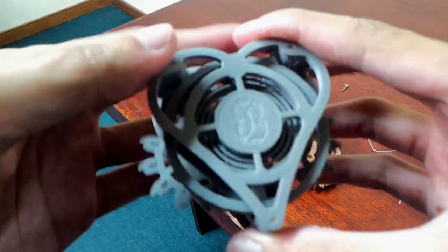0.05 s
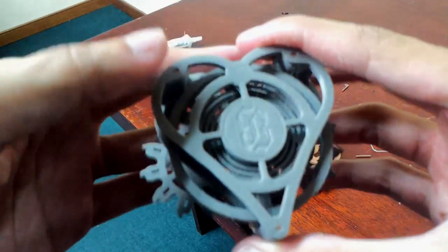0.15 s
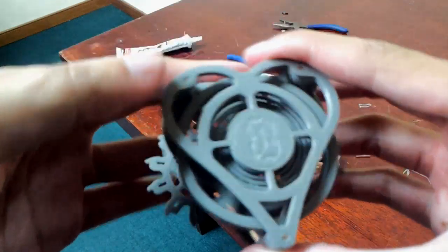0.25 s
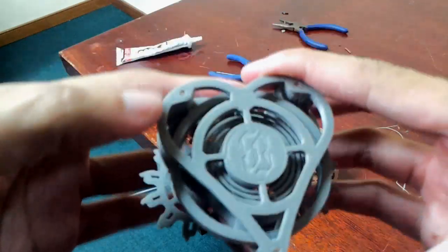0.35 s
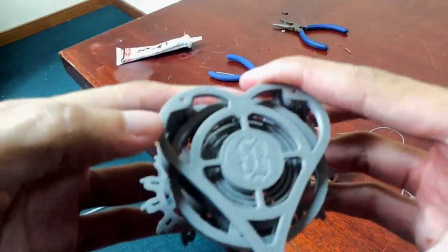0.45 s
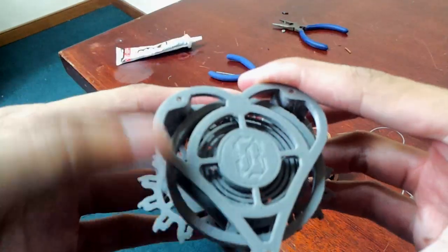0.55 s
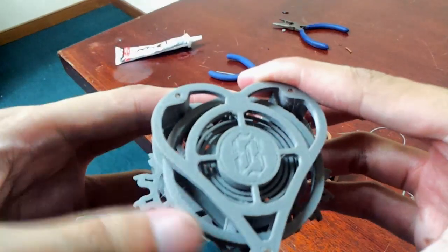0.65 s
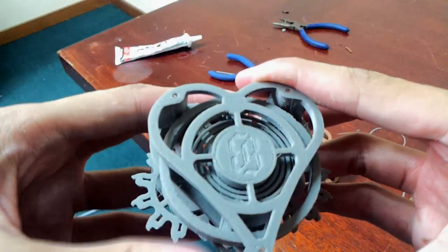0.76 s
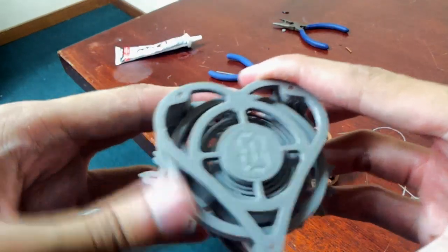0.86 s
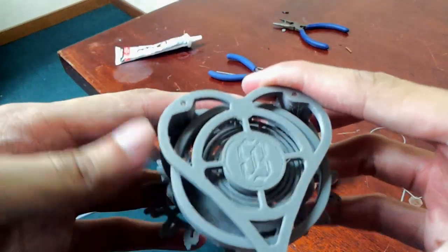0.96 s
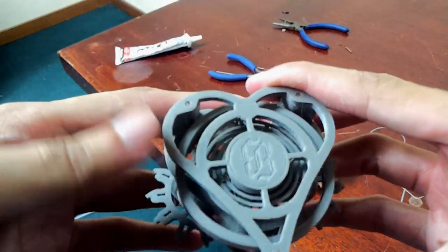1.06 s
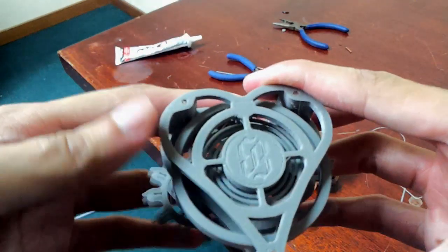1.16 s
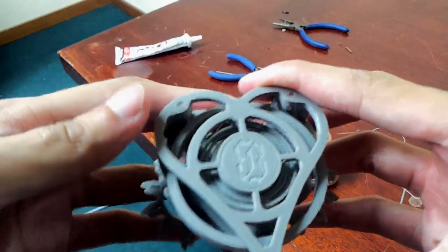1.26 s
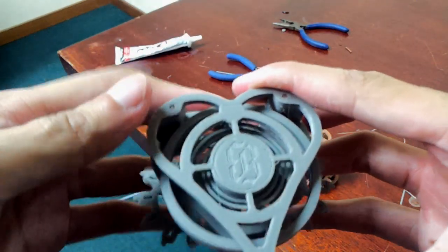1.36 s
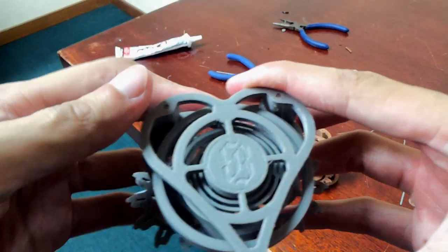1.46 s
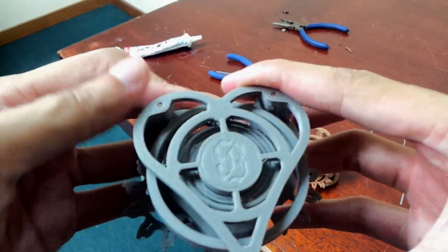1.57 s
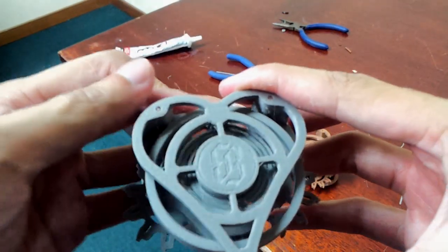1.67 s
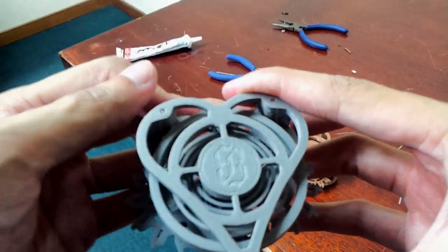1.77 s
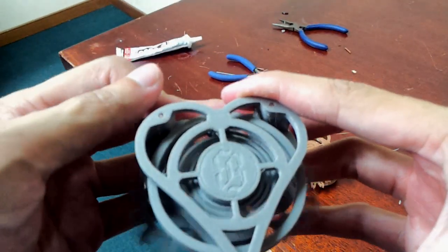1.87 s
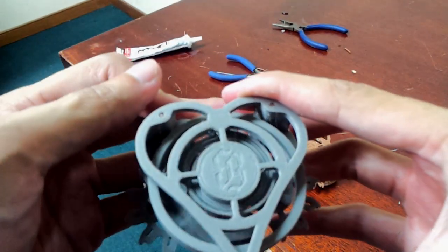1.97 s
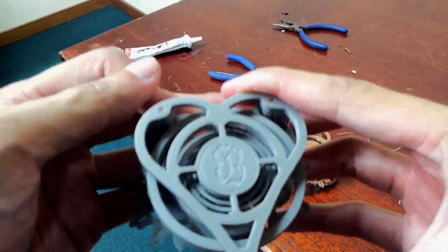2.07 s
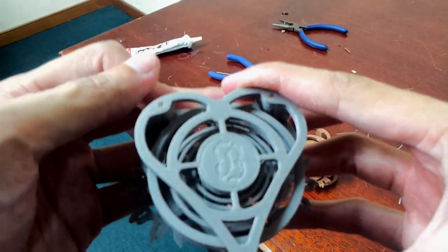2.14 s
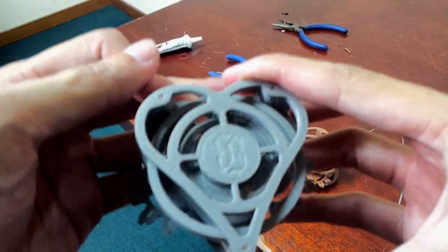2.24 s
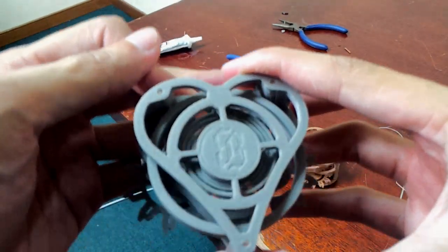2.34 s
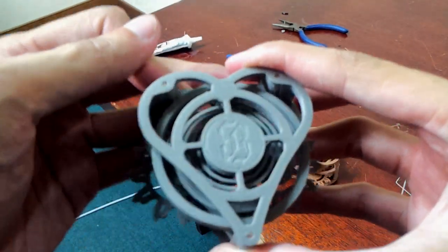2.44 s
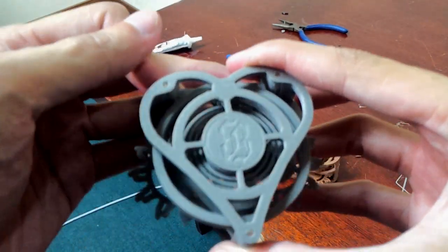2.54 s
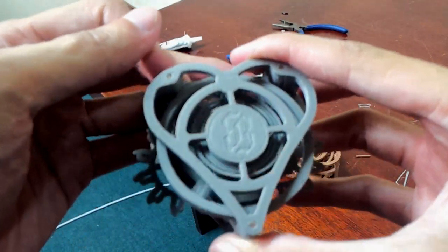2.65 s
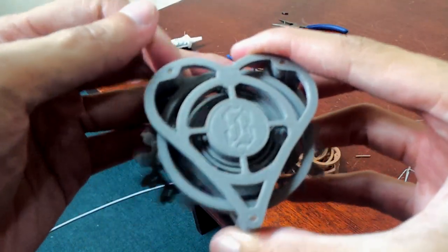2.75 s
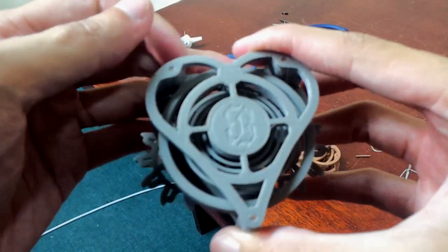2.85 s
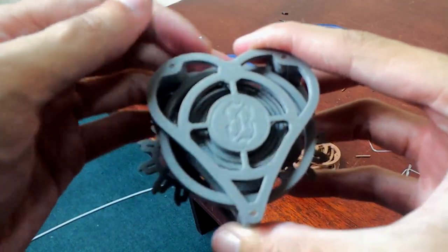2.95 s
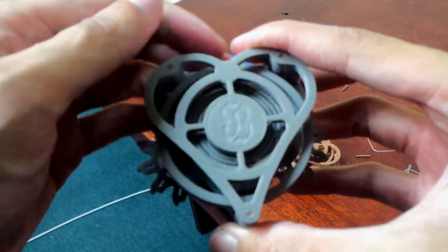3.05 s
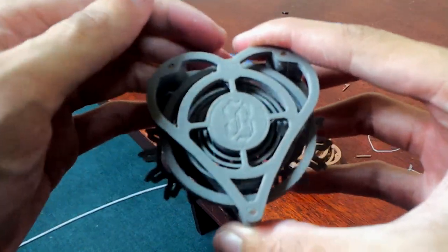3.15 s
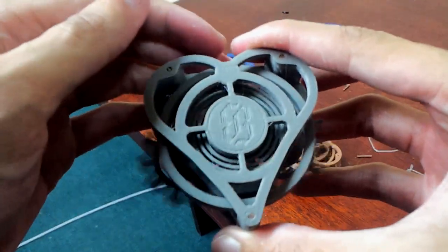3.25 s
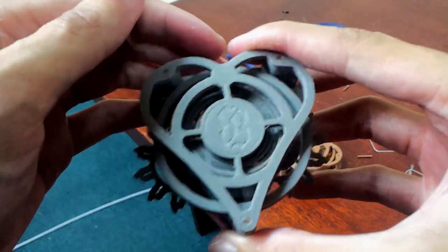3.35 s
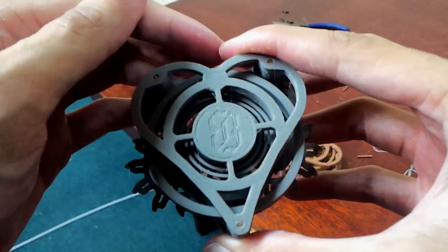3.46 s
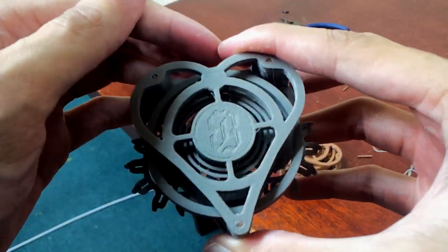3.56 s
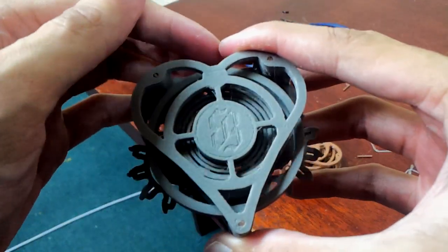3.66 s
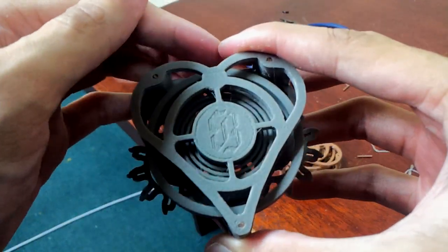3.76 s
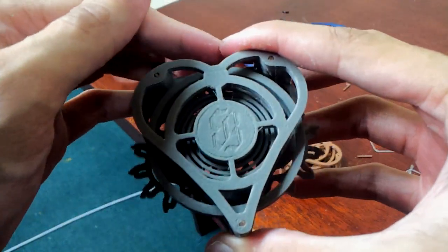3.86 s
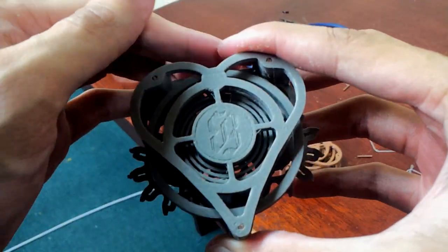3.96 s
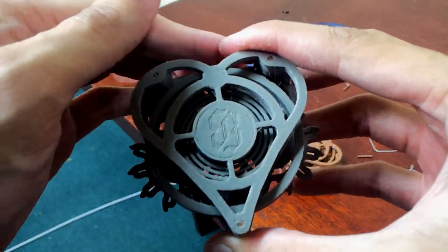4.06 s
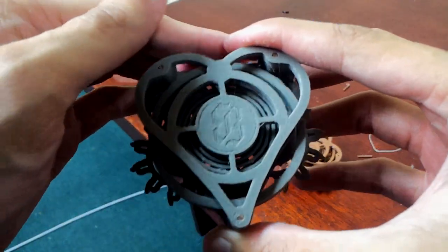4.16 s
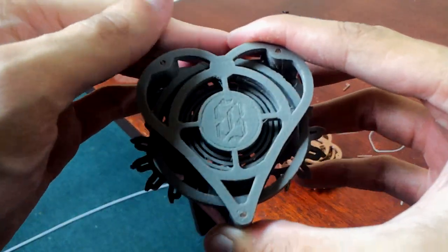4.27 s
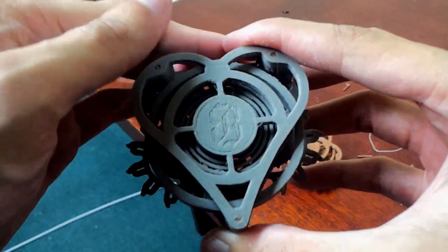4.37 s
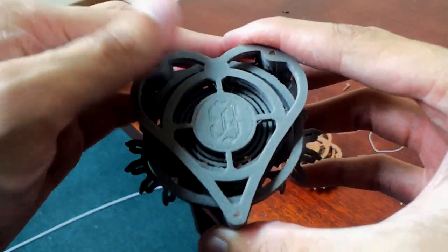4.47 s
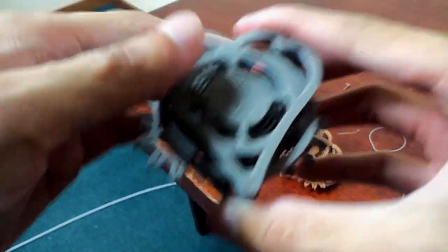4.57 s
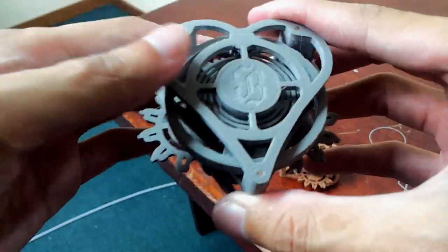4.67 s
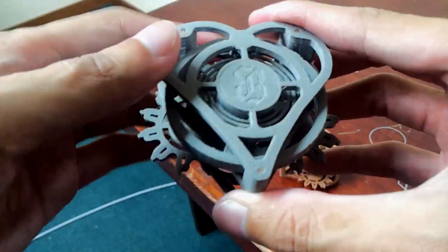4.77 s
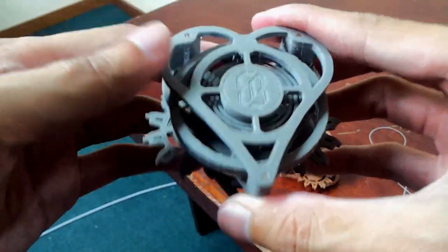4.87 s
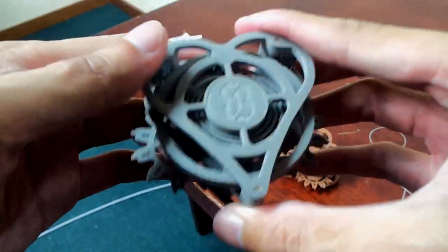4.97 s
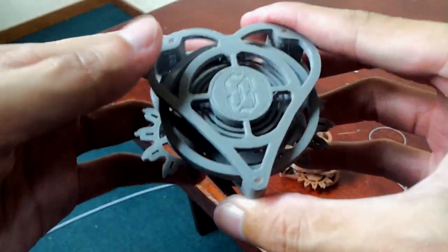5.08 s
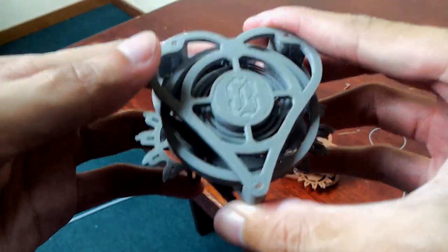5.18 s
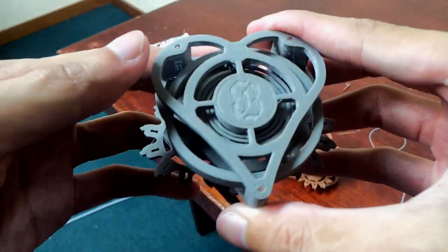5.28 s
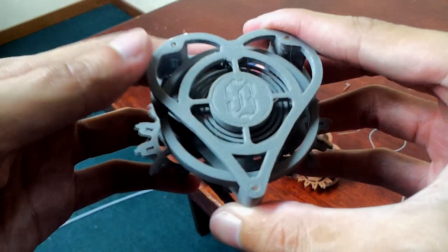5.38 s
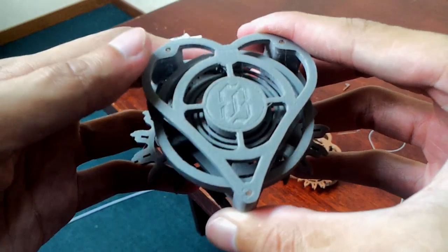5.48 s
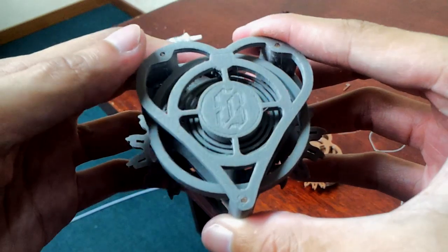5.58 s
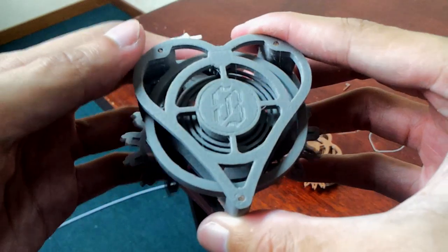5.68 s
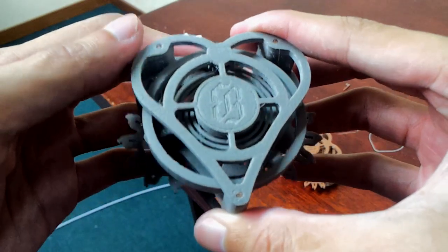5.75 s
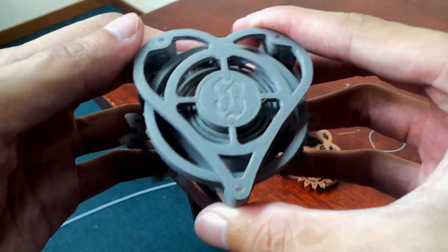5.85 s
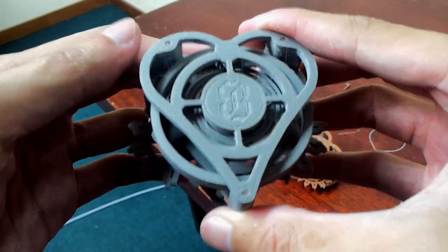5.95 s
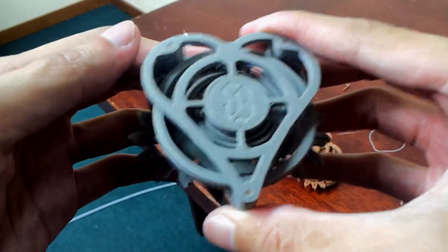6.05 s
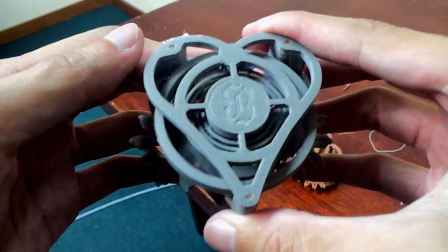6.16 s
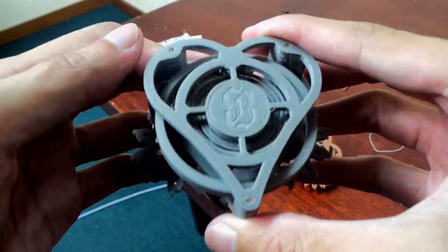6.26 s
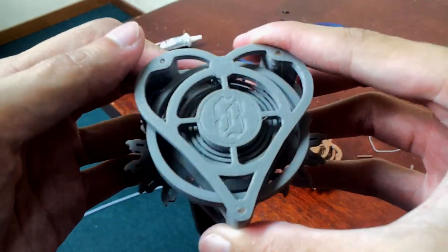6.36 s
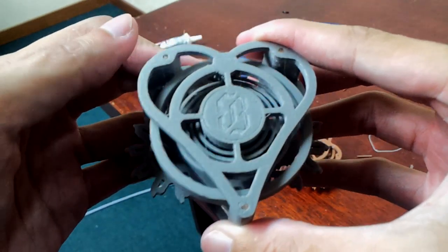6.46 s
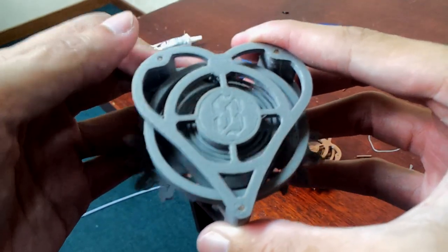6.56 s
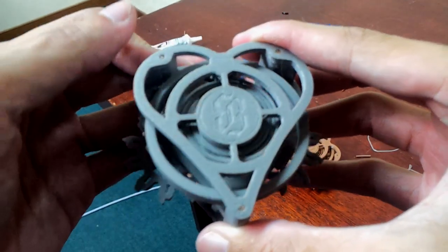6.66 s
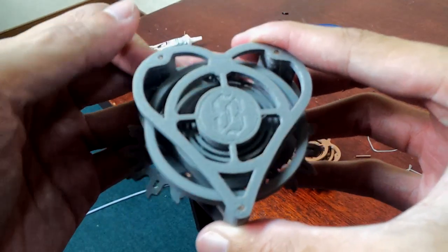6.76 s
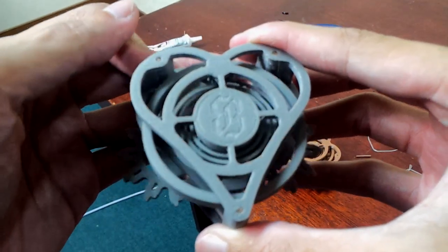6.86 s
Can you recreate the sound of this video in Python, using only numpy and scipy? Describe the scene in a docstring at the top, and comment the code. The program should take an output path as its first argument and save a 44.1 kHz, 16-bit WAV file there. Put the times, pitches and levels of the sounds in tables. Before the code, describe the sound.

A small plastic clockwork toy held in the hands clicks loosely, then ticks briskly about six times a second, stalls, rests, and restarts unevenly.

```python
"""A plastic clockwork toy is held in the hands in a small room; at first only loose gears click and fingers rub.
After a second a finger drives it, and about six times a second the escape wheel unlocks, slides, kicks and drops.
It stalls before the fourth second, rests, and starts again after the fifth, less evenly, until the end.
Contacts are chattering noise bursts through frame modes and a damped tooth ring; slides and rubbing are random
grains. Decaying-noise echoes, lumpy rumble, hiss, a faint whine and hum lie behind it all the way through."""
import sys
import numpy as np
from scipy import signal
from scipy.fft import rfft, irfft, next_fast_len
from scipy.io import wavfile

SR = 44100
rng = np.random.default_rng(int(sys.argv[2]) if len(sys.argv) > 2 else 0)


def transcribe(u):
    """Save the signal u as a 16-bit wav file named by the first command-line argument.

    u: samples, shape (n,) or (channels, n), limited to [-1, 1]; the rate is SR.
    q: integer samples, one column per channel.
    """
    v = np.clip(np.atleast_2d(u).T, -1, 1)
    q = np.round(v * 32767).astype(np.int16)
    wavfile.write(sys.argv[1], SR, q)


N = 305172

# Levels in the tables are starting points; the layers trim them as a whole.
# Beats of the escapement: a tooth unlocks, slides, kicks the fork and drops on the other pallet.
# Each row: drop in seconds, drop level in dB, ring of the drop in Hz, kick in ms before the drop, kick level in dB,
# unlocking in ms before the drop, unlocking level in dB, slide level in dB, frame against tooth in dB.
BEATS = [(1.0361, -20, 12700, 24.4, -26, 37.5, -37.5, -56.5, -10.5),
         (1.2063, -24, 13700, 20.6, -26, 29, -41, -51, -3.5),
         (1.3827, -21, 14200, 14, -27, 31, -36.5, -48, -6.5),
         (1.5525, -23, 14300, 12.7, -32.5, 31, -38, -47, -4),
         (1.7261, -34.5, 13900, 10.4, -29, 22.3, -42, -47.5, -2.5),
         (1.8983, -23, 9450, 8.2, -23, 24.3, -45, -39.5, -4),
         (2.0738, -18.5, 13800, 11.2, -22.5, 20, -31, -42, -7),
         (2.2434, -19.5, 10300, 9, -20, 25.5, -36.5, -42, -8.5),
         (2.4192, -25.5, 10300, 6.2, -23.5, 25.8, -30, -42, -7.5),
         (2.5926, -33, 10100, 8, -31.5, 20.8, -31.5, -43.5, -6.5),
         (2.7687, -31.5, 13600, 13.9, -30, 23.4, -33, -46, -6),
         (2.9402, -22, 9050, 12, -31, 25, -46, -44, -3.5),
         (3.1202, -33.5, 13100, 5, -35, 28, -35.5, -58, -2.5),
         (3.2887, -21.5, 10460, 15.3, -27, 31.3, -37, -45.5, -7.5),
         (3.4652, -23.5, 12900, 19, -31, 39, -43.5, -51, -6.5),
         (3.634, -38.5, 13100, 13, -32, 34.5, -40, -50, -5),
         (3.7791, -34.5, 10300, 8, -38.5, 17, -33.5, -49, -6),
         (5.0816, -35.5, 10800, 8.5, -46, 17, -51, -57.5, 2.5),
         (5.243, -28.5, 14000, 24, -28.5, 38, -47, -57.5, -4),
         (5.4049, -29, 14000, 10, -44.5, 43.8, -47.5, -54.5, -6.5),
         (5.736, -39, 14200, 23.8, -37.5, 25, -60, -71, -2),
         (5.8827, -31.5, 12600, 34.9, -34.5, 52, -53, -63.5, -2.5),
         (6.0609, -18.5, 11400, 20.3, -28, 41, -51, -51.5, -5),
         (6.2295, -28.5, 11000, 17, -27.5, 37, -40.5, -53, -3.5),
         (6.4076, -27, 10700, 13, -22, 27, -50, -43.5, -5),
         (6.578, -28, 12100, 15, -32.5, 27, -46, -44, -6),
         (6.7525, -22, 12100, 10.7, -19.5, 22, -42, -44.5, -2.5),
         (6.9171, -33.5, 9900, 8.7, -30, 24.7, -34, -49.5, -2.5)]
# Gears taking up their play as the toy is handled.
# Each row: time in seconds, level in dB, frame against tooth in dB.
GEAR_CLICKS = [(0.1476, -42.5, -5), (0.1608, -41.5, -9), (0.2447, -48.5, -2), (0.2503, -37.5, -3),
               (0.2935, -60, 6.5), (0.3661, -41.5, -8), (0.8126, -47, -7), (0.9064, -51, -4),
               (0.9189, -50.5, 2), (0.9258, -41, -3), (0.987, -43.5, -5), (1.1575, -46.5, 1.5),
               (1.308, -45, -8), (1.5796, -34, -15), (1.9214, -35.5, -10), (2.0238, -33.5, -18),
               (2.2668, -31.5, -17), (2.3719, -41.5, -12), (2.4427, -41, -6), (2.6185, -37, -14),
               (3.052, -39.5, -11.5), (3.7898, -38.5, -4.5), (3.9097, -45, -6), (4.1666, -36.5, 0),
               (4.546, -63, 1), (4.7127, -47, 5), (4.7424, -53.5, -5), (4.803, -56, -4),
               (4.9186, -54.5, -16), (5.02, -40, -8), (5.0272, -42.5, -0.5), (5.4231, -42.5, -3.5),
               (5.585, -42.5, -7), (6.3255, -43.5, -12), (6.6839, -43, -10.5)]
# How hard the fingers work the toy; they rest twice. Each row: time in seconds, level in dB.
GRIP = [(0, -75.5), (.42, -73.5), (.6, -98), (.78, -100), (.84, -64.5), (.95, -62.5), (1.3, -65.5),
        (2.3, -70.5), (2.5, -57), (2.75, -67.5), (3.2, -75.5), (3.92, -65.5), (4.1, -80), (4.5, -91),
        (4.55, -75), (5.45, -69), (5.6, -73.5), (6.92, -67.5)]
# The hollow frame bumping in the fingers. Each row: start in seconds, level in dB.
FRAME_THUNKS = [(0.158, -56.5), (0.248, -54), (.922, -54.5), (1.205, -47.5), (3.909, -63), (5.083, -57.5)]
# Modes of the plastic frame. Each row: frequency in Hz, 60 dB decay time in seconds, relative level in dB.
FRAME_MODES = [(995, 0.0072, -14.5), (1492, 0.047, -16.5), (2140, 0.021, -27), (2530, 0.02, -14),
               (2794, 0.033, 1.5), (3347, 0.018, 0.5), (3726, 0.013, 0), (3856, 0.038, 4.5),
               (4300, .016, -28.5), (4890, 0.02, -2.5), (5190, 0.0073, -9.5), (6554, 0.0041, -8)]
# Colour of the contact heard through the frame. Each row: frequency in Hz, relative level in dB.
FRAME_COLOUR = [(40, -42.5), (150, -25.5), (500, -16.5), (950, -7.5), (1600, -3.5), (2700, 4.5), (3800, 2),
                (4500, 0.5), (6600, -0.5), (7600, -14)]
# Colour of the contact heard off the tooth. Each row: frequency in Hz, relative level in dB.
TOOTH_COLOUR = [(5500, -40.5), (7100, -12), (8400, -0.5), (9700, 2.5), (11000, 2), (13000, 2.5),
                (14400, -1.5)]
# Dull bumps of the hands on the frame. Each row: frequency in Hz, relative level in dB.
BUMP_COLOUR = [(25, -11), (80, -6), (160, -1.5), (350, -5.5), (700, -8), (1500, -19), (4000, -57)]
# The room's answer. Each row: frequency in Hz, level in dB.
ROOM_COLOUR = [(60, 9.5), (150, 11), (320, 14.5), (600, 3.5), (1400, 4.5), (2200, -5), (3800, -5),
               (4600, -8.5), (7000, -4), (9700, -5), (11500, -7.5), (14500, -9)]
# Colour of the room sound in the side channel. Each row: frequency in Hz, level in dB.
SIDE_COLOUR = [(200, -15), (600, -2), (1200, -9.5), (2200, -24), (4500, -12), (8000, -9), (14000, -12)]
# Spectrum of the steady background. Each row: frequency in Hz, relative level per Hz in dB.
AIR_COLOUR = [(20, -18.5), (45, -13), (70, 2.5), (95, -5.5), (130, -5.5), (200, -9.5), (300, -16.5),
              (470, -23), (820, -25), (2700, -28), (6200, -33.5), (10000, -32), (12500, -35.5),
              (14500, -53)]
# Electrical hum. Each row: frequency in Hz, rms level in dB.
HUM_LINES = [(66, -84.5), (100, -88), (200, -84.5), (300, -89), (400, -87.5)]

# chatter length of each kind of contact at ordinary strength
UNLOCK_MS, KICK_MS, DROP_MS, CLICK_MS = 2.4, 3.6, 2.8, 2.2
# centre pitch of the tooth's ring: escape wheel, and the larger loose gears
WHEEL_HZ, GEAR_HZ = 13800, 10800
AIR_DB = -70.5  # rms of the background noise before its rumble turns lumpy
TOP_HZ = 14650  # upper edge of the treble


def escapement():
    """Every beat strikes three times: a light unlocking, the kick to the fork, the drop."""
    s, drop_db, drop_hz, kick_ms, kick_db, unlock_ms, unlock_db, _, knock_db = np.transpose(BEATS)
    unlocks = np.column_stack([s - unlock_ms / 1000, unlock_db, knock_db])
    kicks = np.column_stack([s - kick_ms / 1000, kick_db, knock_db])
    drops = np.column_stack([s, drop_db, knock_db])
    return np.vstack([
        contacts(unlocks, WHEEL_HZ, UNLOCK_MS),
        contacts(kicks, WHEEL_HZ, KICK_MS),
        contacts(drops, drop_hz, DROP_MS, detune=0.01)])


def contacts(hits, ring_hz, contact_ms, detune=0.088, uneven=0.19, ordinary_db=-30, halving_db=70):
    """Give each hit (s, dB, frame against tooth dB) its own ring and chatter length; harder hits are crisper."""
    s, db, knock_db = np.transpose(hits)
    pitch, length = np.clip(rng.standard_normal((len(s), 2)), -2, 2).T
    # chatter halves for every halving_db above ordinary strength
    crispness = 2 ** ((ordinary_db - db) / halving_db)
    chatter_ms = contact_ms * np.exp(uneven * length) * crispness
    return np.column_stack([s, db + knock_db, db, ring_hz * np.exp(detune * pitch), chatter_ms])


def impacts(table, rise_s, settle_t60, rattle_db, rattle_t60, frame_db, tooth_db, uneven_db=3):
    """Each contact (s, frame dB, tooth dB, ring Hz, ms) chatters unevenly, dies fast and leaves the gears rattling."""
    out, t = np.zeros(N), np.arange(2048) / SR
    for s, low_db, high_db, hz, contact_ms in table:
        # decay starts halfway through the chatter length
        after = np.maximum(t - contact_ms / 1000 / 2, 0)
        decay = fade(after, settle_t60) + undb(rattle_db) * fade(after, rattle_t60)
        press = np.minimum(t / rise_s, 1) * decay
        # the contact force jumps about every third of a millisecond
        chatter = np.repeat(rng.standard_normal(128), 16)
        force = press * undb(uneven_db * chatter) * rng.standard_normal(len(t))
        knock = blow(frame(force), low_db + frame_db)
        snap = blow(tooth(force, hz), high_db + tooth_db)
        add(out, s - rise_s / 2, knock + snap)
    return out


def frame(force, ring_db=7, detune=0.029, place_db=4.5):
    """The frame's dull knock and short modes; their pitch and weight shift with grip and point of contact."""
    chance = rng.standard_normal((len(FRAME_MODES), 2))
    ring = 0
    for (hz, t60, db), (shift, weight) in zip(FRAME_MODES, chance):
        width_hz = np.log(1000) / np.pi / t60
        mode = resonate(force, hz * (1 + detune * shift), width_hz)
        ring = ring + undb(db + place_db * weight) * mode
    return colour(force, FRAME_COLOUR) + undb(ring_db) * ring


def tooth(force, hz, ring_db=4, width_hz=900):
    """The bright snap of a small tooth, with one heavily damped ring."""
    ring = resonate(force, hz, width_hz)
    return colour(force + undb(ring_db) * ring, TOOTH_COLOUR)


def slides(edge_s=0.0034, ridge_s=0.0014, ridge_db=3, overrun_s=0.0066, swell_db=6,
           longest_s=0.0308, pause_s=0.0018):
    """From unlocking until just after the drop, teeth catch and slip over print ridges, pressing ever harder."""
    pressure, t = np.zeros(N), np.arange(N) / SR
    for s, *_, unlock_ms, _, db, _ in BEATS:
        start = s - min(unlock_ms / 1000 - pause_s, longest_s)
        end = s + overrun_s
        span = np.arange(start, end, 1 / SR)
        swell = swell_db * np.linspace(-.5, .5, len(span))
        edges = np.clip(np.minimum(span - start, end - span) / edge_s, 0, 1)
        add(pressure, start, undb(db + swell) * edges)
    # every ridge has its own height
    ridges = np.clip(rng.standard_normal(N), -2, 2)[(t / ridge_s).astype(int)]
    force = pressure * unit(undb(ridge_db * ridges)) * grains(N, per_s=5000, spread_db=1.0)
    dull = unit(frame(force, place_db=-2))
    bright = unit(tooth(force, 10000, ring_db=-3.5, width_hz=2300))
    return np.std(force) * (undb(-1.5) * dull + bright)


def grains(count, per_s, spread_db):
    """Tiny random slips of uneven size and either sign, rms 1."""
    chance, size, sign = rng.random(count), rng.exponential(size=count), rng.standard_normal(count)
    slips = (chance < per_s / SR) * np.sign(sign) * undb(spread_db * np.minimum(size, 4))
    return unit(slips + 1e-9)


def loose_gears(count=60, above_grip_db=13, spread_db=4, knock_db=-7, faint_ms=0.9):
    """The clear clicks of gear play, and faint crisp ones at random that grow with the handling."""
    place, size = rng.random((count, 2)).T
    s = (np.arange(count) + place) / count * N / SR
    faint_db = grip(s) + above_grip_db + spread_db * (2 * size - 1)
    faint = np.column_stack([s, faint_db, np.full(count, knock_db)])
    return np.vstack([
        contacts(GEAR_CLICKS, GEAR_HZ, CLICK_MS, detune=0.15),
        contacts(faint, GEAR_HZ, faint_ms, detune=0.11)])


def grip(s):
    """Level of the handling at time s, in dB, gliding between the grip points."""
    return np.interp(s, *np.transpose(GRIP))


def fingers(rub_db=-5.5, bump_db=-80, bump_share=0.45):
    """Skin and loose parts creak softly against the frame, and the shifting hands bump it."""
    grip_db = grip(np.arange(N) / SR)
    force = undb(grip_db) * grains(N, per_s=2400, spread_db=3.5)
    dull = unit(frame(force, place_db=0.0))
    bright = unit(tooth(force, 9600, ring_db=-17.5, width_hz=290))
    rub = undb(rub_db) * np.std(force) * (undb(-6) * dull + bright)
    # bumps follow the grip less steeply than the rubbing does
    bump_force = undb(bump_share * grip_db) * grains(N, per_s=120, spread_db=2.5)
    bumps = colour(bump_force, BUMP_COLOUR)
    return rub + undb(bump_db) * unit(bumps)


def thunks(hz=750, width_hz=800, push_t60=0.025):
    """A soft, longer push wakes only the low, heavily damped bending of the frame."""
    out, t = np.zeros(N), np.arange(2048) / SR
    for s, db in FRAME_THUNKS:
        force = fade(t, push_t60) * rng.standard_normal(len(t))
        bend = resonate(resonate(force, hz, width_hz), hz, width_hz)
        add(out, s, blow(bend, db))
    return out


def shiver(toy, t60=0.18, frame_db=-1):
    """Shaken by the toy's own sound, the loose gear train buzzes on in tiny collisions as its energy drains."""
    keep = fade(1 / SR, t60) ** 2
    energy = signal.lfilter([1 - keep], [1, -keep], toy ** 2)
    force = np.sqrt(energy) * grains(N, per_s=2000, spread_db=2.0)
    dull = unit(frame(force, ring_db=-12.5, place_db=-2.5))
    bright = unit(tooth(force, 9750, ring_db=1.5, width_hz=700))
    return np.std(force) * (undb(frame_db) * dull + bright)


def room(x, count=24):
    """The toy keeps moving in the hands, so each stretch of its sound meets another pattern of echoes."""
    out, hop = np.zeros(N), N // count + 1
    for start in range(0, N, hop):
        add(out, start / SR, signal.fftconvolve(x[start:start + hop], echoes()))
    return colour(out, ROOM_COLOUR)


def echoes(low_t60=0.43, high_t60=0.26, build_s=0.0021, near_db=-3, near_t60=0.065):
    """Early reflections off hands and bench, then the diffuse tail of a small room, all as decaying noise."""
    t = np.arange(SR // 2) / SR
    low, high, near = rng.standard_normal((3, len(t)))
    low = signal.sosfilt(signal.butter(2, 4500, fs=SR, output="sos"), low)
    high = signal.sosfilt(signal.butter(2, 4500, "high", fs=SR, output="sos"), high)
    tail = low * fade(t, low_t60) + high * fade(t, high_t60) + undb(near_db) * near * fade(t, near_t60)
    tail = tail * (1 - np.exp(-(t / build_s) ** 2))
    return tail / np.sqrt(np.sum(tail ** 2))


def air(whine_hz=11250, whine_width_hz=260, whine_db=-85, lumps_db=3.5, lumps_per_s=14):
    """Lumpy low rumble and smooth faint hiss of the workshop, with a thin high whine of narrow noise."""
    noise = undb(AIR_DB) * unit(colour(rng.standard_normal(N), AIR_COLOUR))
    rumble = signal.sosfiltfilt(signal.butter(2, 350, fs=SR, output="sos"), noise)
    hiss = noise - rumble
    lumps = np.interp(np.arange(N) / SR * lumps_per_s, np.arange(400), rng.standard_normal(400))
    whine = resonate(rng.standard_normal(N), whine_hz, whine_width_hz)
    whine = resonate(whine, whine_hz, whine_width_hz)
    return hiss + rumble * unit(undb(lumps_db * lumps)) + undb(whine_db) * unit(whine)


def hum(wander_hz=1.2):
    """A few sine lines of hum, each wavering slightly in pitch."""
    t, knots = np.arange(N) / SR, np.linspace(0, N / SR, 40)
    out = 0
    for hz, db in HUM_LINES:
        drift = wander_hz * np.interp(t, knots, rng.standard_normal(len(knots)))
        phase = 2 * np.pi * np.cumsum(hz + drift) / SR
        out = out + np.sqrt(2) * undb(db) * np.sin(phase)
    return out


def undb(db):
    """Decibels to gain."""
    return 10 ** (np.asarray(db) / 20)


def unit(x):
    """Scale to rms 1."""
    return x / np.sqrt(np.mean(x ** 2))


def blow(x, db):
    """Scale a click so that its energy, packed into one millisecond, has this level."""
    return x * undb(db) / np.sqrt(np.sum(x ** 2) * 1000 / SR)


def fade(t, t60):
    """Exponential decay, 60 dB down after t60."""
    return np.exp(-np.log(1000) * t / t60)


def resonate(x, hz, width_hz):
    """One resonance, gain 1 at its centre."""
    return signal.lfilter(*signal.iirpeak(min(hz, .45 * SR), hz / width_hz, fs=SR), x)


def colour(x, points):
    """Causal filter through (Hz, dB) points, built from the cepstrum."""
    size = next_fast_len(len(x) + 2048, real=True) * 2
    hz, db = np.transpose(points)
    freq = np.maximum(np.arange(size // 2 + 1) * SR / size, 1)
    gain = undb(np.interp(np.log(freq), np.log(hz), db))
    cepstrum = irfft(np.log(gain))
    # folding the cepstrum forward gives minimum phase
    cepstrum[1:size // 2] *= 2
    cepstrum[size // 2 + 1:] = 0
    return irfft(rfft(x, size) * np.exp(rfft(cepstrum)))[:len(x)]


def add(track, s, sound):
    """Mix a sound into the track at time s."""
    start = max(int(s * SR), 0)
    track[start:start + len(sound)] += sound[:max(len(track) - start, 0)]


def scene():
    """The toy sits dead centre; only the room and the background have a little width."""
    beats = impacts(escapement(), rise_s=.0005, settle_t60=0.017, rattle_db=-20.5, rattle_t60=0.028,
                    frame_db=-1.0, tooth_db=1.35)
    clicks = impacts(loose_gears(), rise_s=0.00044, settle_t60=0.021, rattle_db=-12, rattle_t60=0.061,
                     frame_db=0.5, tooth_db=0.3)
    toy = beats + clicks + slides() + fingers() + thunks()
    toy = toy + undb(-19.0) * shiver(toy)
    mid = toy + undb(-12) * room(toy) + air() + hum()
    side = undb(-14.0) * colour(room(toy), SIDE_COLOUR) + undb(-8.5) * air()
    return np.array([mid + side, mid - side])


def expander(x, threshold_db=-76, slope=3.5, depth_db=6, release_s=0.015):
    """Noise suppression turns everything down when little is heard above the rumble."""
    heard = signal.sosfilt(signal.butter(2, 1500, "high", fs=SR, output="sos"), x.mean(axis=0))
    keep = np.exp(-1 / (release_s * SR))
    power = signal.lfilter([1 - keep], [1, -keep], heard ** 2)
    level_db = 10 * np.log10(power + 1e-12)
    cut_db = np.clip(slope * (threshold_db - level_db), 0, depth_db)
    return x * undb(-cut_db)


def record(dry):
    """The phone hushes the pauses and cuts the top of the treble with a steep low-pass."""
    low_pass = signal.ellip(8, .2, 70, TOP_HZ, fs=SR, output="sos")
    return signal.sosfilt(low_pass, expander(dry))


dry = scene()
out = record(dry)
transcribe(out)
```